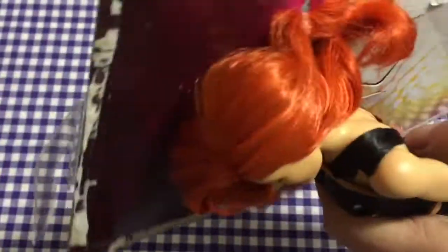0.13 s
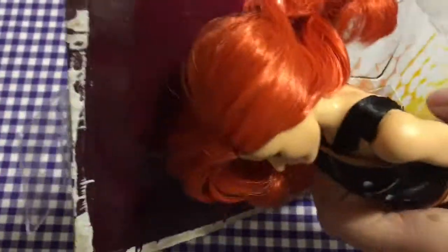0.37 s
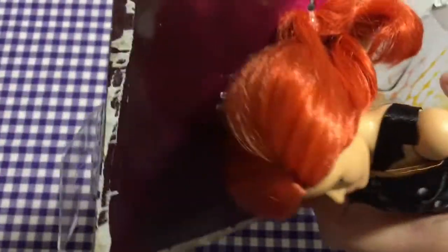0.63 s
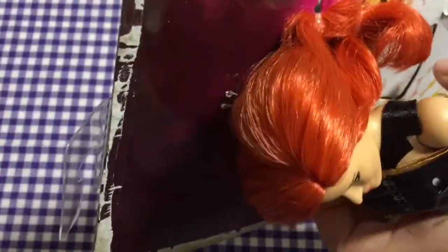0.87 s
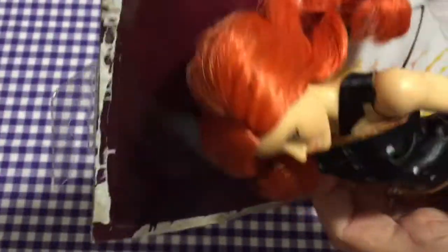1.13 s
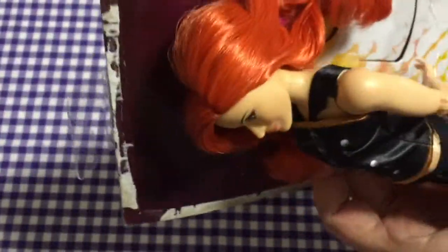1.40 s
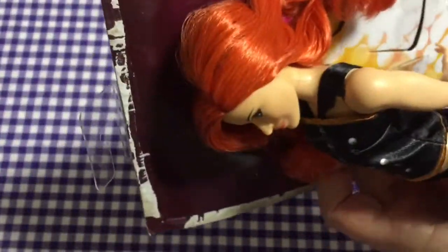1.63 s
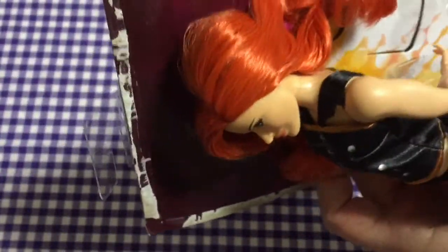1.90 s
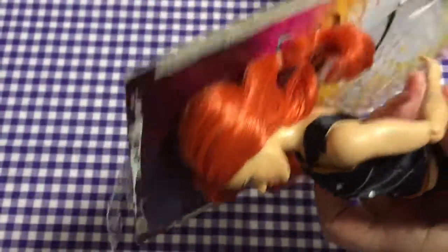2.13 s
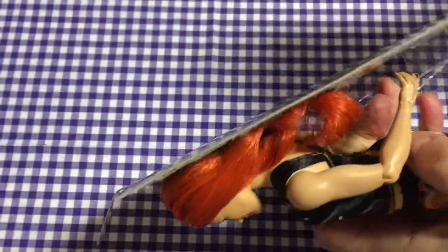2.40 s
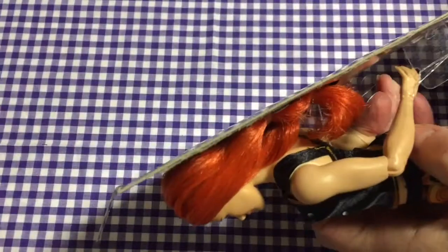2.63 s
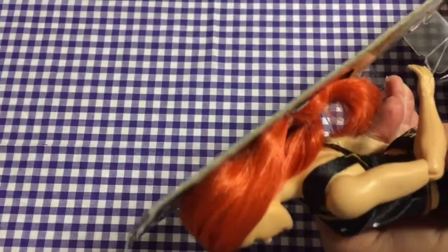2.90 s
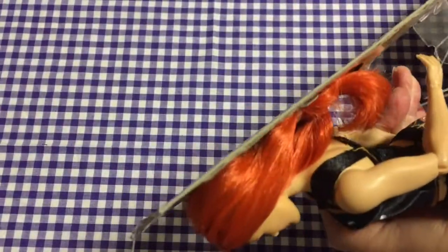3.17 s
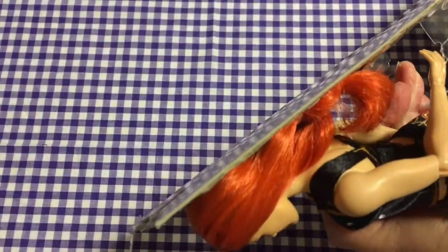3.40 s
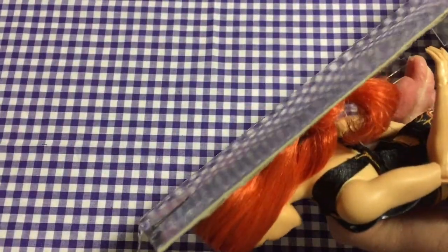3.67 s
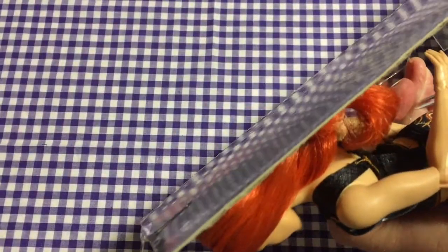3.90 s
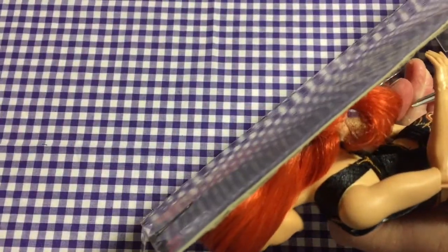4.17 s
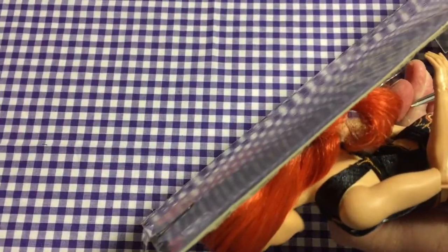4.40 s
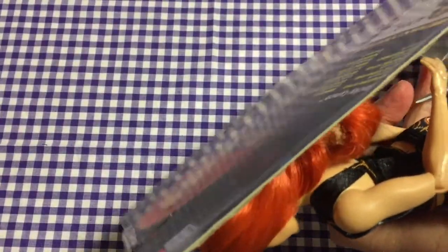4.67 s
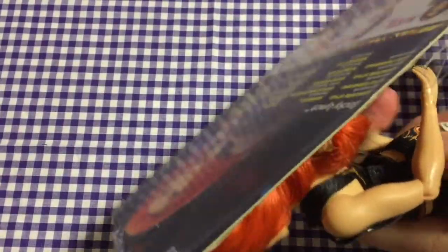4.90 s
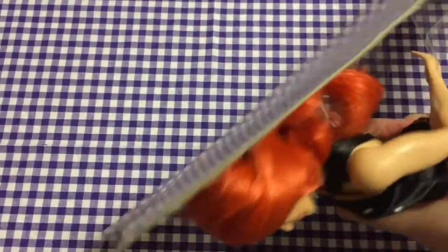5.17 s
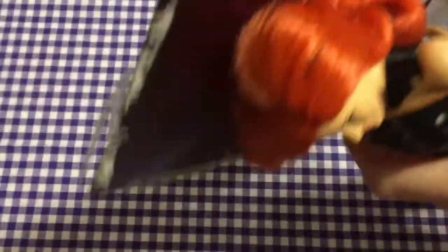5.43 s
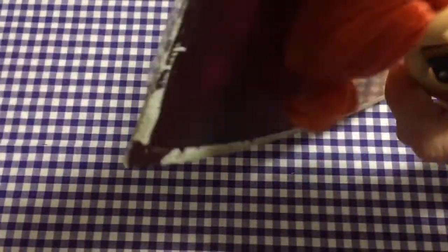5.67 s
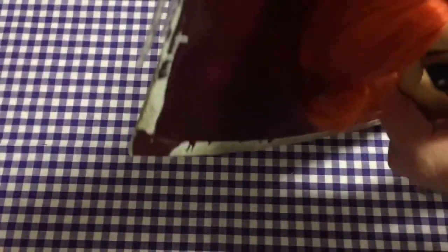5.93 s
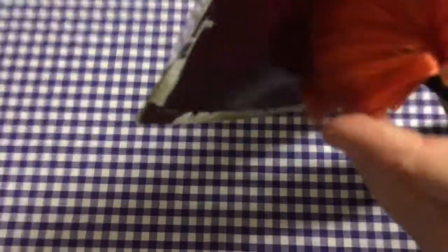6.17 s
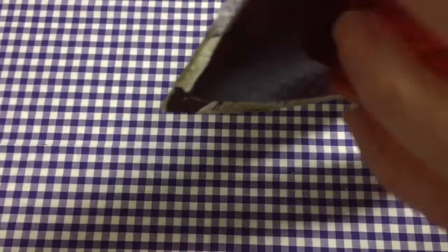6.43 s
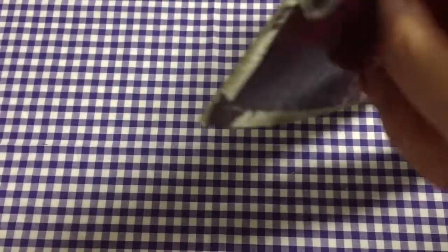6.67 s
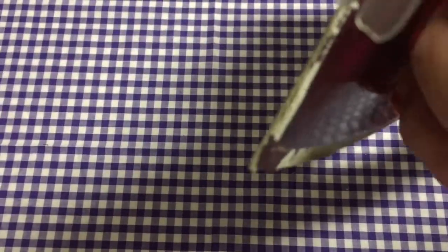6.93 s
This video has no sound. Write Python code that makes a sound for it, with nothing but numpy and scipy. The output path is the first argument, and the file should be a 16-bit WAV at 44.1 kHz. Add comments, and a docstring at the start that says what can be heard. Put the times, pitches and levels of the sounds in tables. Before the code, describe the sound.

A close, dry phone pickup in a small room with soft, steady air noise. From 0 to 2.3 s, hands handle a plastic tray on card: light irregular clicks, bright crinkles and short gritty scuffs, some with a papery knock. A very faint low drone from outdoors swells at the start, near 1.2 s and around 2.4 s, then sinks. A sharp plastic snap stands out at 2.36 s. Only weak rubbing and a few tiny ticks follow, almost still from 3.3 to 4.6 s. A hard bright crack at 4.64 s breaks the quiet, then hissy stroking, and another crack with a table tap at 5.3 s. Small clicks continue until a tight pair of loud snaps near 6.09 s and the heaviest damped table thump at 6.2 s. Crisp ticks and rubbing carry on, with a stronger click at 6.67 s and another right at the end, about 7.06 s.

```python
"""Hands work a toy out of a plastic tray on a cardboard back, close to a phone, above a cloth-covered table.
0-3.3 s: snaps (noise bursts ringing film and card) amid rubbing (gritty noise), loudest snap at 2.36 s;
a low drone (wavering sine) from outdoors swells at 0, 1.15 and 2.4 s, then sinks. 3.3-4.6 s: near rest.
From 4.6 s: hard snaps at 4.64, 5.30 and 6.09 s, bumps on the table (decaying modes), hardest at 6.20 s;
ticks and rubbing run to the end. Air noise throughout; a small room answers pack and hands."""
import sys
import numpy as np
from scipy import signal
from scipy.fft import rfft, irfft, next_fast_len
from scipy.io import wavfile
from scipy.ndimage import uniform_filter1d, map_coordinates

SR = 44100
rng = np.random.default_rng(int(sys.argv[2]) if len(sys.argv) > 2 else 0)


def volts_from_db(level):
    """Convert decibel levels to linear amplitude ratios."""
    exponent = np.asarray(level, float) / 20
    return 10 ** exponent


def waveform_to_disk(signal):
    """Save audio, clipped to [-1, 1], as 16-bit WAV at the path in sys.argv[1]."""
    frames = np.transpose(np.atleast_2d(signal))
    scaled = np.clip(frames, -1, 1) * 32767
    samples = np.round(scaled).astype(np.int16)
    wavfile.write(sys.argv[1], SR, samples)


N = 311346

# Room and microphone noise spectrum: f/Hz, relative density/dB
AIR_SPECTRUM = [(15, -39.5), (25, -5.5), (53, -5), (74, -4), (108, -13), (208, -7.5), (238, -17),
                (280, -10.5), (321, -23), (349, -17.5), (422, -37.5), (553, -38), (651, -24.5),
                (12200, -40), (16500, -52.5)]
# Outdoor drone: t/s, f/Hz, relative level/dB
DRONE_PATH = [(0, 61, -49), (.3, 66, -83), (.9, 66.2, -88), (1.15, 66, -47.5), (1.4, 70.1, -84),
              (1.9, 69.1, -54.5), (2.4, 68.9, -50.5), (2.75, 66, -52.5), (3.1, 65, -57), (3.6, 62.3, -61),
              (4.2, 60.3, -74), (4.8, 60, -85), (7.06, 60, -60.5)]
# Room decay: f/Hz, t60/s
ROOM_DECAY = [(200, 0.068), (1000, 0.2), (4000, .17), (12000, 0.16)]
# Table top modes: f/Hz, relative level/dB, t60 without hands/s
TABLETOP_MODES = [(48.4, -7, .55), (66, -12, .4), (97, -15, 1.1), (115, -3, .3), (161, -5, .25),
                  (205, -12, .3), (253, -1, .28), (314, -2, .2), (366, 0, .19), (450, -9, .13),
                  (576, -8, .14), (762, 0, .08), (858, -5, .08), (970, -3, .08), (1180, -2, .06),
                  (1320, -7, .06)]
# Pack against table: t/s, relative level/dB, contact/s, damping by hands/(dB/s)
PACK_BUMPS = [(0.084, -27, 0.0031, 246), (0.123, -40, 0.0016, 250), (0.886, -48, 0.0011, 300),
              (5.3009, -7.5, 0.000063, 17), (5.347, -20.5, 0.00042, 139), (5.66, -31, 0.0021, 251),
              (5.7, -23, 0.0039, 247), (5.868, -38, 0.0021, 285), (6.087, -25.5, 0.00043, 397),
              (6.189, -18, 0.0017, 396.5), (6.201, 2, 0.0086, 346), (6.241, -8.5, 0.0074, 394),
              (6.375, -25, 0.0044, 395), (6.543, -39, 0.00095, 390), (6.676, -39.5, 0.00057, 500),
              (6.709, -35, 0.0015, 513)]
# Card resonances: f/Hz, width/Hz, relative level/dB
CARD_MODES = [(386, 140, -3.5), (640, 320, 4.5), (928, 520, 3.5), (1145, 260, 5), (1700, 420, -2)]
# Film resonances: f/Hz, width/Hz, relative level/dB
FILM_MODES = [(1944, 250, -2), (3000, 980, -0.5), (3560, 130, 3), (4010, 500, -1.5), (5710, 540, -3),
              (6170, 530, -4)]
# Friction hiss spectrum: f/Hz, relative density/dB
HISS_SPECTRUM = [(3530, -18.5), (6000, -4.5), (10400, -10), (11500, -8.5), (15200, -10), (16200, -19),
                 (16500, -49)]
# Friction of the holding hands: t/s, relative level on card/dB
HOLDING_GRIP = [(0, -71), (1, -70), (1.8, -74.5), (2.45, -70.5), (2.8, -67.5), (3.1, -69), (3.4, -75.5),
                (3.7, -76), (4.55, -82.5), (5.5, -73), (6.3, -72), (7.06, -74)]
# Fingers scuffing card: peak t/s, length/s, relative level/dB
CARD_SCUFFS = [(.115, 0.11, -50.5), (.264, 0.074, -69), (.524, 0.067, -52), (.768, 0.085, -51),
               (.818, 0.018, -41), (.958, 0.047, -65.5), (1.083, 0.11, -50), (1.237, 0.091, -47.5),
               (1.367, 0.2, -66), (1.487, 0.14, -55.5), (1.557, 0.047, -45), (1.576, 0.075, -47),
               (1.626, 0.047, -46), (1.691, 0.072, -48.5), (1.961, .09, -59), (2.085, 0.077, -57.5),
               (2.112, 0.09, -53.5), (2.178, 0.075, -58.5), (2.255, 0.25, -61.5), (2.33, 0.083, -60),
               (4.634, .1, -58), (4.918, 0.27, -63.5), (5.148, 0.063, -57.5), (5.323, 0.1, -35),
               (5.715, 0.22, -54.5), (5.83, .15, -81), (5.95, .15, -62.5), (6.038, 0.23, -58.5),
               (6.127, 0.086, -46), (6.196, 0.18, -57.5), (6.361, 0.044, -56), (6.465, 0.081, -60.5),
               (6.555, 0.12, -50.5), (6.679, 0.047, -37.5), (6.79, 0.39, -57.5), (7.06, 0.13, -73)]
# Fingers and hair over film: peak t/s, length/s, relative level/dB, singing patch f/Hz, hiss over film/dB
FILM_STROKES = [(.03, 0.19, -54, 3060, 2.5), (0.1, 0.16, -55, 5100, 4.5), (0.269, 0.15, -53.5, 4090, 3.5),
                (0.321, 0.19, -63, 3460, 2.5), (0.536, 0.35, -59, 1958, 0.5), (0.58, 0.43, -87, 6520, -5),
                (0.758, 0.11, -53.5, 2966, -11), (0.812, 0.043, -54, 1944, -10),
                (0.956, 0.036, -59.5, 4364, -0.5), (1.09, 0.14, -54.5, 4440, -2.5),
                (1.157, 0.25, -60, 2930, 1), (1.215, 0.16, -48, 3040, -7.5), (1.367, 0.083, -52.5, 6400, 3),
                (1.493, 0.17, -59.5, 3520, -7), (1.542, 0.058, -48, 1966, -27),
                (1.575, .06, -53, 3000, -20), (1.63, 0.059, -51, 2627, -5), (1.685, 0.072, -54, 2845, 0.5),
                (1.964, 0.061, -59, 3130, -26), (2.045, 0.062, -57, 2095, -5),
                (2.135, 0.11, -50, 3095, -29), (2.257, 0.15, -50, 2510, -1), (2.331, 0.033, -51.5, 4180, 5),
                (2.768, 0.042, -54, 3067, -1), (2.873, 0.57, -68, 2132, 3), (3.098, 0.27, -65, 5500, -8),
                (3.26, .15, -65.5, 5950, -3), (3.575, 0.18, -70.5, 5646, 3), (4.666, .13, -63, 5430, 5.5),
                (4.943, 0.58, -55, 4786, -4.5), (5.059, .35, -66, 5990, 7.5), (5.196, 0.28, -51.5, 5240, 2),
                (5.318, .1, -38.5, 3174, -22), (5.516, 0.074, -61, 3126, -13),
                (5.599, 0.089, -65, 3800, -12), (5.711, 0.17, -47.5, 3600, -2), (5.82, 0.1, -61, 3240, -20),
                (5.889, 0.11, -59, 3585, -11.5), (5.959, 0.6, -60.5, 6550, -1.5),
                (6.044, .15, -50, 3780, -14.5), (6.121, .12, -60, 3130, -19.5),
                (6.19, 0.11, -57, 3495, -6.5), (6.293, 0.24, -68.5, 3000, -14),
                (6.39, 0.058, -59, 3560, -7), (6.464, 0.13, -56.5, 5640, 2.5), (6.563, 0.17, -55, 6230, -5),
                (6.661, 0.16, -54, 5000, -19), (6.742, 0.18, -56, 4090, 3), (6.789, 0.13, -49, 4000, -3),
                (6.863, 0.14, -57, 3000, -16), (7.06, .1, -58, 2750, -4)]
# Buckling plastic: t/s, relative level/dB, ring f/Hz, card knock over ring/dB, treble over ring/dB
PLASTIC_SNAPS = [(.0174, -31.5, 4260, -32, -2), (.101, -34, 5120, -25, -18), (.1156, -32, 5200, -13, -19),
                 (.128, -35, 5200, -20, -20.5), (.231, -41, 1510, -17, -9.5), (.2523, -29, 3980, -6, -6),
                 (.61, -46.5, 3570, -6.5, 3), (.7217, -44.5, 2800, -5, -23), (.7627, -32.5, 4610, -14, -1),
                 (.7705, -38, 3570, -1, -11.5), (.8178, -44.5, 1800, 4.5, -27.5),
                 (.9555, -45, 4900, -27, -4.5), (1.0765, -33.5, 3050, -13, -29),
                 (1.1309, -29, 5200, -28, -4), (1.1836, -34, 3174, -4, -7), (1.2501, -28, 3010, -19, -11.5),
                 (1.2553, -28, 2980, -25, -23), (1.286, -36.5, 1520, 0.5, -18),
                 (1.4806, -26, 3600, -4.5, -32), (1.5001, -39.5, 5070, -2, -16.5),
                 (1.5369, -34, 1970, -2, -34), (1.5467, -42.5, 4450, -15, -33.5),
                 (1.5787, -38, 2740, -8, -19), (1.6232, -22, 2770, -16, -21.5),
                 (1.688, -32.5, 4500, -18, -20), (1.9516, -42, 3800, 3.5, -30),
                 (2.0413, -42, 5400, -9.5, -4.5), (2.082, -36, 4130, -15.5, -15),
                 (2.1207, -37, 3120, -11, -19.5), (2.1357, -36, 3150, -6, -21),
                 (2.183, -35, 3200, -17, -27.5), (2.1884, -37, 4180, -4, -25.5),
                 (2.334, -29.5, 4090, -21.5, -15), (2.3569, -8.5, 5130, -8, -15),
                 (2.766, -44, 5700, -21, 5), (2.993, -41.5, 5450, -14, -6.5), (3.0927, -37.5, 4200, -5, -3),
                 (3.1053, -37.5, 3240, -12, -13), (3.147, -34, 6400, -33, -7.5),
                 (3.2488, -47.5, 6160, -31, -5), (4.6354, -4, 5360, -14.5, -15),
                 (4.6586, -28, 2840, -9.5, 2), (4.6656, -32, 2920, -17.5, -12),
                 (4.715, -41, 5350, -30, -18.5), (4.7945, -45, 5500, -14, -15),
                 (4.8954, -39.5, 3530, -11, -10.5), (5.0795, -47, 9040, -26, 8),
                 (5.1435, -23, 6300, -27.5, -1), (5.199, -48.5, 2260, 8.5, -13.5),
                 (5.2753, -43.5, 2670, -2.5, 2), (5.301, -6.5, 3670, -3.5, -23),
                 (5.4335, -55, 3870, -11, -3.5), (5.5016, -41.5, 3960, -12, -12),
                 (5.5056, -49, 3000, -25, -5.5), (5.6023, -29, 6700, -40, -4.5),
                 (5.6614, -35, 2255, -9, -3), (5.6853, -31.5, 2680, -15, -4.5),
                 (5.791, -35.5, 3400, -36, -9.5), (5.8013, -35, 3300, -40, -2), (5.81, -31, 3360, -22, -15),
                 (5.8164, -32, 3630, -19, -4.5), (5.8709, -45.5, 2720, 4.5, -4),
                 (5.9638, -40, 6600, -23.5, 3.5), (6.0838, -8, 4010, -14.5, -21.5),
                 (6.0893, -4, 3200, -7, -23), (6.0988, -27, 3300, -16.5, -14.5),
                 (6.1063, -18.5, 3170, -4, -21.5), (6.1451, -33.5, 3420, -11, -17.5),
                 (6.1892, -40.5, 2730, -4, -5.5), (6.1976, -42.5, 11700, -4.5, 7),
                 (6.4911, -33, 3530, -13, -20), (6.5448, -39.5, 1496, -0.5, -6),
                 (6.643, -37, 3530, -11, -7), (6.6532, -25.5, 3620, -27, -21),
                 (6.6741, -17, 6290, -5.5, -2), (6.695, -31.5, 3570, -29, -11.5),
                 (6.709, -34, 3000, 1.5, -3.5), (6.7982, -34, 7970, -19, -7),
                 (6.8182, -33.5, 3900, -26, -18), (6.841, -38, 2960, -28, -9),
                 (6.8626, -40.5, 3000, -10, -4), (6.8887, -38, 3340, -19, -5),
                 (6.9075, -37, 2994, -30, -21.5), (6.936, -46.5, 3280, -23, -5),
                 (7.0359, -33, 1670, -3.5, -27), (7.0569, -16.5, 2800, -4, -6.5)]


def unit(x):
    """Scale to rms 1 along time."""
    return x / np.sqrt(np.mean(x ** 2, axis=-1, keepdims=True) + 1e-20)


def along(points, hz):
    """Interpolate (Hz, value) points on a log frequency axis."""
    f, v = np.transpose(points)
    return np.interp(np.log(hz + 1), np.log(f + 1), v)


def curves(rows):
    """One value per sample for each column after the time."""
    s, *cols = np.transpose(rows)
    return [np.interp(np.arange(N) / SR, s, c) for c in cols]


def wobble(knots_per_s):
    """Smooth random curve: a spline through random knots."""
    knots = rng.standard_normal(int(N * 200 / SR) + 4)
    return map_coordinates(knots, [np.arange(N) * knots_per_s / SR])


def filtered(x, response):
    """Filter x by a complex response of frequency."""
    m = next_fast_len(x.shape[-1] + 4096)
    return irfft(rfft(x, m) * response(np.fft.rfftfreq(m, 1 / SR)), m)[..., :x.shape[-1]]


def peak(f, hz, width_hz):
    """One causal resonance."""
    return 1j * f * width_hz / (hz * hz - f * f + 1j * f * width_hz)


def body(modes):
    """Response of resonances side by side, alternating in sign."""
    return lambda f: sum((-1) ** k * volts_from_db(db) * peak(f, hz, w) for k, (hz, w, db) in enumerate(modes))


def treble(f):
    """Broad top end of thin film."""
    return peak(f, 9000, 7500) ** 2


def background():
    """Steady air noise is shaped white noise; the drone is a sine unsteady in level and pitch."""
    air_rms_db = -63.5
    hz, db = curves(DRONE_PATH)
    throb, waver = wobble(13), wobble(16)
    phase = 2 * np.pi * np.cumsum(hz + 4 * waver) / SR
    drone = volts_from_db(db + 4 * throb - 1) * np.sin(phase)
    air = unit(filtered(rng.standard_normal(N), lambda f: volts_from_db(along(AIR_SPECTRUM, f))))
    return drone + volts_from_db(air_rms_db) * air


def room(x):
    """Noise tail, each frequency dying at its own speed; a fresh tail every 0.25 s evens out its colour."""
    delay_samples = 130
    out, hop = np.zeros(N + SR), SR // 4
    for start in range(0, N, hop):
        hz, t, z = signal.stft(rng.standard_normal(SR // 3), SR, nperseg=256)
        decay = volts_from_db(-60 * t / along(ROOM_DECAY, hz)[:, None])
        tail = signal.istft(z * decay, SR, nperseg=256)[1]
        wet = signal.fftconvolve(x[start:start + hop], tail / np.linalg.norm(tail))
        out[start + delay_samples:][:len(wet)] += wet
    return out[:N]


def bumps():
    """Each contact rings the table's modes; longer contact weakens the upper ones, a resting hand damps all."""
    out, t = np.zeros(N + SR), np.arange(SR // 2) / SR
    hz, level_db, t60_s = np.transpose(TABLETOP_MODES)[:, :, None]
    bloom = 1 - np.exp(-t / (0.011 * (50 / hz) ** 2))  # deepest modes build up late
    onset = 0.95 + 0.41 * np.exp(-t / .006)
    knot_s = np.arange(SR // 100) * 100 / SR
    for s, db, contact_s, damping_db_per_s in PACK_BUMPS:
        strike = volts_from_db(rng.normal(0, 1.2, len(hz))) / (1 + (2 * hz[:, 0] * contact_s) ** 3)
        # cloth and pack blur the upper modes: random phase drift
        drift = np.cumsum(rng.standard_normal((len(hz), len(knot_s))), axis=1)
        blur = 0.00092 * hz * np.array([np.interp(t, knot_s, d - d[0]) for d in drift])
        decay = volts_from_db(level_db - t * (60 / t60_s + damping_db_per_s))
        modes = bloom * onset * decay * np.sin(2 * np.pi * hz * t + blur)
        out[round(s * SR):][:len(t)] += volts_from_db(db - 8) * strike @ modes
    return out[:N]


def swells(s, length_s, db):
    """Gain of strokes that swell to a peak and fade; their powers add."""
    rise_share, edge_db, roundness = 0.43, 21.5, 1.15  # share before peak, drop at ends, bend of flanks
    t = np.arange(0, N / SR + .01, .002)
    before = (s[:, None] - t) / rise_share
    after = (t - s[:, None]) / (1 - rise_share)
    u = np.maximum(before, after) / length_s[:, None]
    gain = np.sqrt(np.sum(volts_from_db(db[:, None] - edge_db * u ** roundness) ** 2, axis=0))
    return np.interp(np.arange(N) / SR, t, gain)


def gritty(spread_db, patchy_db, sing_db=0):
    """Friction: noise samples now and then catch hard; patches sing, most where the finger pulls."""
    slips = rng.standard_normal(N) * volts_from_db(spread_db * np.minimum(rng.exponential(size=N), 6))
    f, t, z = signal.stft(slips, SR, nperseg=256)
    field = uniform_filter1d(rng.standard_normal(z.shape), size=2, axis=0)
    field = uniform_filter1d(field, size=9, axis=1)
    s, pull_hz = np.transpose(FILM_STROKES)[[0, 3]]
    patch_db = sing_db * np.exp(-(np.log(f[:, None] / pull_hz + 1e-9) / .09) ** 2)
    sing = np.array([np.interp(t, s, row) for row in patch_db])  # one patch fades into the next
    gain = volts_from_db(patchy_db * field / field.std() + sing)
    return signal.istft(z * gain, nperseg=256)[1][:N]


def rubbing():
    """Skin and hair drag over card and film in uneven little jerks."""
    grip_film_db, grip_hiss_db = -2.5, -9  # re card
    s, length_s, db, _, hiss_db = np.transpose(FILM_STROKES)
    grip = volts_from_db(curves(HOLDING_GRIP)[0])
    jerk = wobble(60)
    card = unit(filtered(gritty(2.5, patchy_db=4.0), lambda f: body(CARD_MODES)(f) * peak(f, 680, 2200)))
    film = unit(filtered(gritty(4.0, patchy_db=4.0, sing_db=8.5), body(FILM_MODES)))
    hiss = unit(filtered(gritty(2.4, patchy_db=2.3), lambda f: volts_from_db(along(HISS_SPECTRUM, f))))
    card_gain = np.hypot(swells(*np.transpose(CARD_SCUFFS)), grip) * volts_from_db(1.6 * jerk + 1.3 * wobble(25))
    film_gain = np.hypot(swells(s, length_s, db), grip * volts_from_db(grip_film_db)) * volts_from_db(2.2 * jerk)
    hiss_gain = np.hypot(swells(s, length_s, db + hiss_db), grip * volts_from_db(grip_hiss_db)) * volts_from_db(0.43 * jerk)
    return card * card_gain + film * film_gain + hiss * hiss_gain


def even(x):
    """Level the coarse spectrum of short noise bursts, so that chance gaps do not colour the snaps."""
    z = rfft(x)
    power = uniform_filter1d(np.abs(z) ** 2, size=36, axis=-1)
    return irfft(z / np.sqrt(np.abs(power) + 1e-12), x.shape[-1])


def burst_norm(x):
    """Scale each burst to a loudest 1 ms rms of 1."""
    return x / np.sqrt(uniform_filter1d(x ** 2, size=44, axis=1).max(axis=1, keepdims=True))


def ticks(count=110):
    """Rows of small random snaps, shed by the film strokes."""
    pick, when, size, pitch, knock, top = rng.random((count, 6)).T
    strokes = np.array(FILM_STROKES)[(pick * len(FILM_STROKES)).astype(int), :3]
    s, length_s, db = strokes.T
    off = when - .5
    tick_s = np.clip(s + 0.48 * off * length_s, 0, N / SR)
    tick_db = db + 8.5 - 25 * abs(off) - 3.5 * np.log(size)
    tick_hz = 3600 * volts_from_db(9 * (pitch - .5))
    return np.transpose([tick_s, tick_db, tick_hz, -25 + 22 * knock, -22 + 18 * top])


def snaps():
    """Each buckle tears loose, peaks and dies: it rings its own patch of film and the card behind."""
    s, db, hz, knock_db, treble_db = np.transpose([*PLASTIC_SNAPS, *ticks()])[:, :, None]
    # harder snaps ring the card higher and steadier
    weak = np.clip(-(db + 5.5) / 25, 0, 1)
    scatter = np.exp(0.27 * weak * rng.standard_normal(s.shape))
    knock_hz = 778.3 * volts_from_db(.155 * (db + 37)) * scatter
    lead = 300  # samples ahead of the peak
    t = (np.arange(3000) - lead) / SR
    noise = rng.standard_normal((len(s), 3, len(t)))
    life_s = 0.0054 * volts_from_db(0.081 * (db + 40.0))  # bigger buckles last longer
    after = np.maximum(t, 0)
    rise = volts_from_db(60 * np.minimum(t, 0) / (.6 * life_s))
    chatter = -60 * after / (8 * life_s)  # dB, faint and slow
    film_burst = rise * (volts_from_db(-60 * after / life_s) + volts_from_db(-19.5 + chatter))
    card_burst = rise * (volts_from_db(-60 * after / (0.96 * life_s)) + volts_from_db(-11.5 + chatter))
    broad = volts_from_db(0.28 * db - 4.5)  # big ones crack broadly
    ring = filtered(even(noise[:, 0] * film_burst),
                    lambda f: (peak(f, hz, 0.08 * hz) + broad) * peak(f, 3600, 5000) ** 2)
    fizz = filtered(even(noise[:, 1] * film_burst), treble)
    knock = filtered(even(noise[:, 2] * card_burst),
                     lambda f: (peak(f, knock_hz, 160) + 0.29 * body(CARD_MODES)(f)) * peak(f, 730, 1500))
    mix = burst_norm(ring) + volts_from_db(treble_db) * burst_norm(fizz) + volts_from_db(knock_db) * burst_norm(knock)
    rows = volts_from_db(db - 6.5) * mix
    at = np.round(s * SR).astype(int) + np.arange(len(t))
    return np.bincount(at.ravel(), rows.ravel(), N + len(t))[lead:N + lead]


def scene():
    """Pack and hands close by, their room answer, table bumps and background."""
    pack = snaps() + rubbing()
    return (pack + bumps() + volts_from_db(-14.0) * room(pack) + background())[None]


def top_cut(x):
    """Nothing passes above the cut-off."""
    return signal.sosfilt(signal.butter(12, 16810, fs=SR, output="sos"), x)


def record(dry):
    """The small microphone drops the deepest bass; the hardest peaks are rounded off."""
    heard = filtered(dry, lambda f: (1j * f / (33 + 1j * f)) ** 4)
    heard = heard / (1 + np.abs(heard / .95) ** 6) ** (1 / 6)
    return top_cut(heard)


dry = scene()
out = record(dry)
waveform_to_disk(out)
```